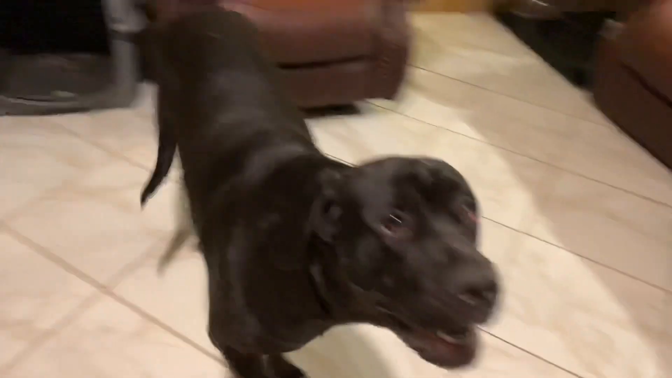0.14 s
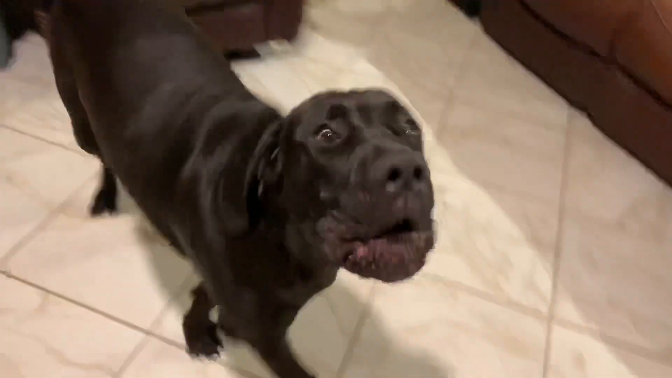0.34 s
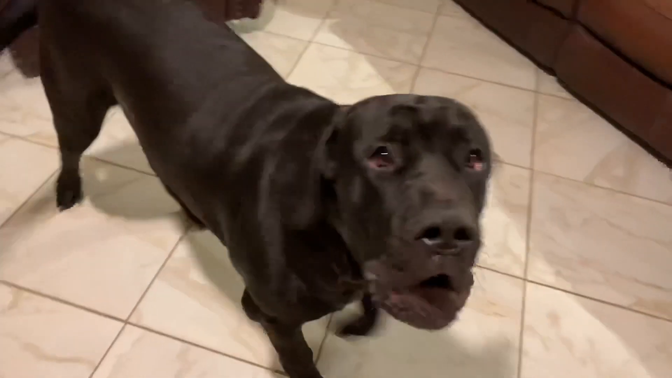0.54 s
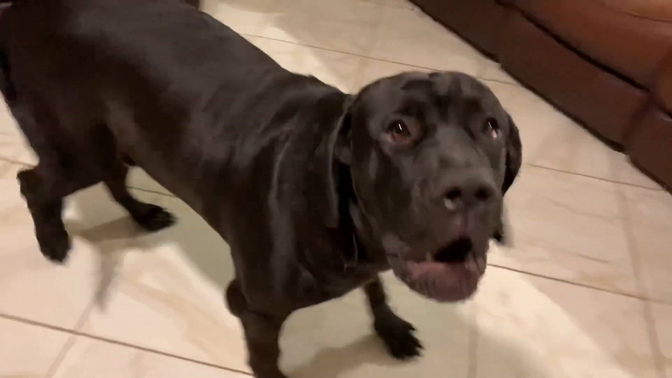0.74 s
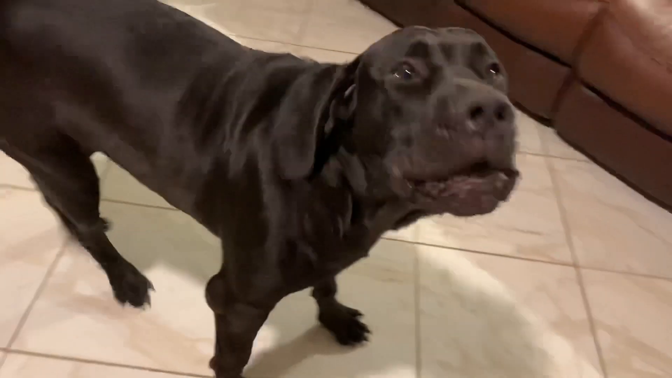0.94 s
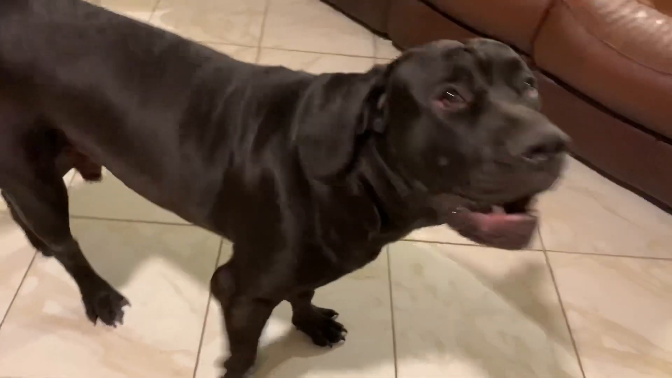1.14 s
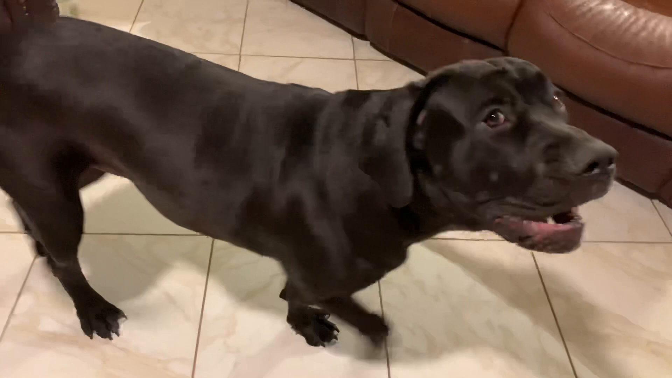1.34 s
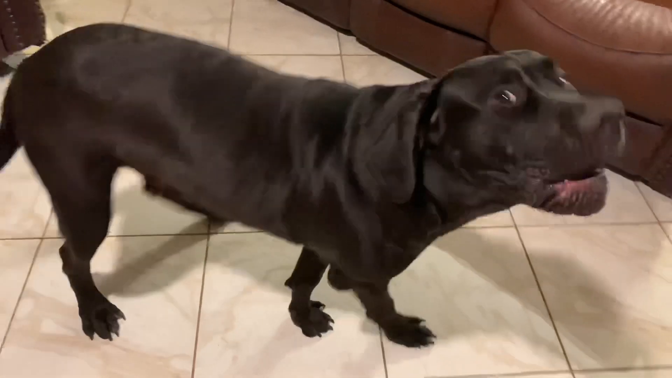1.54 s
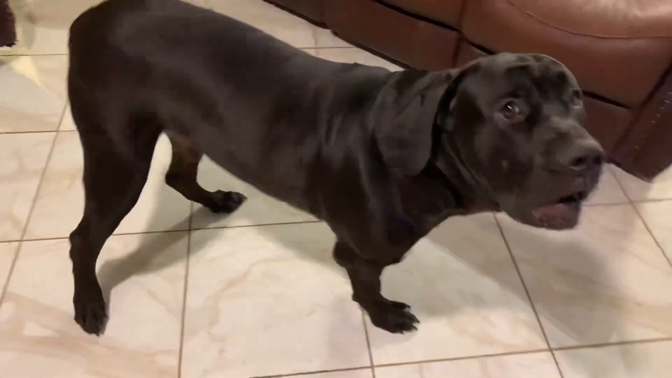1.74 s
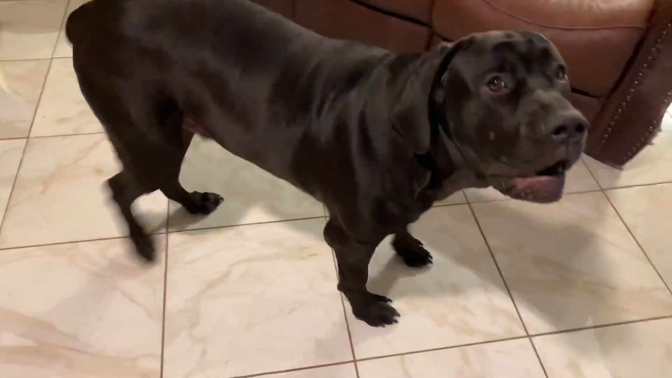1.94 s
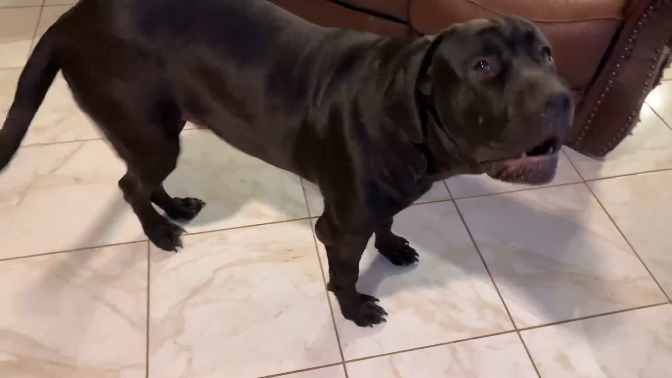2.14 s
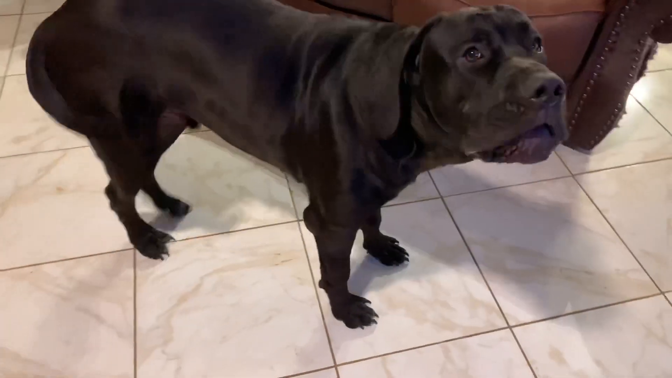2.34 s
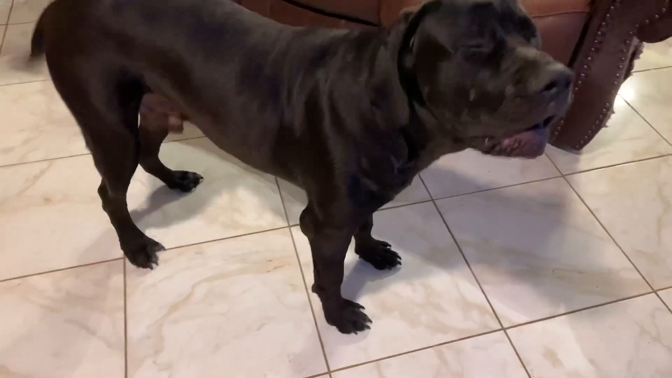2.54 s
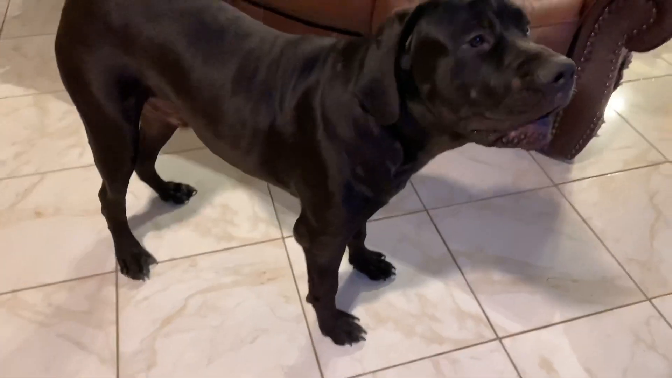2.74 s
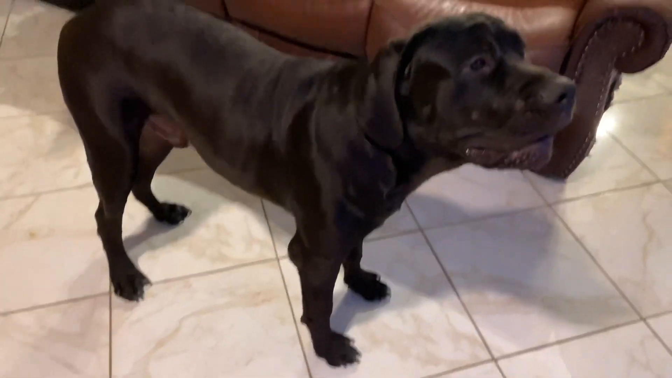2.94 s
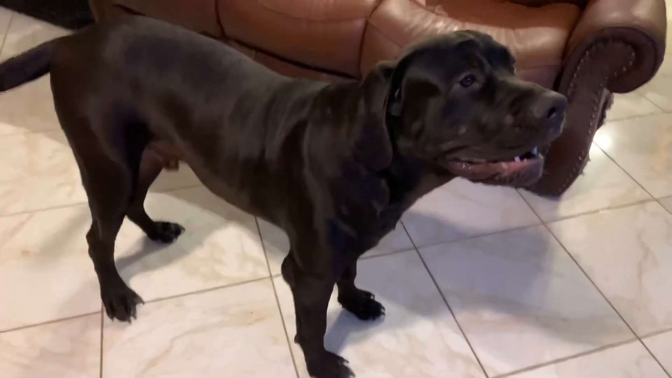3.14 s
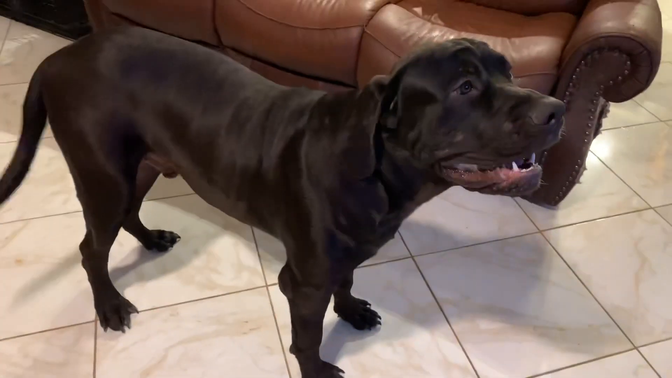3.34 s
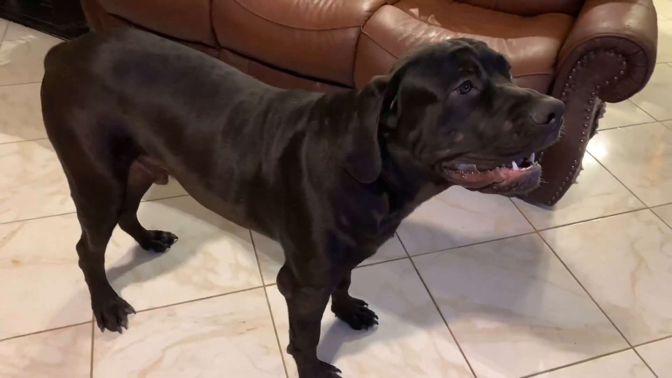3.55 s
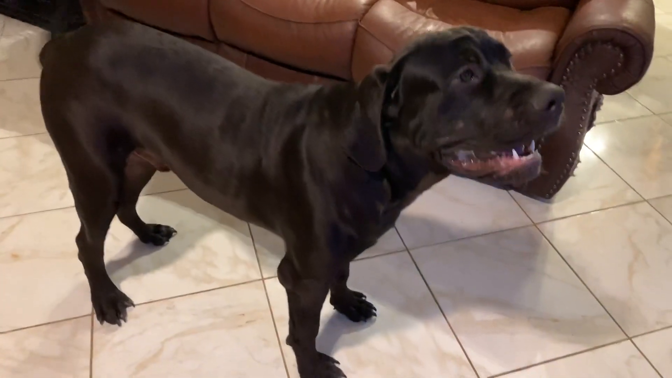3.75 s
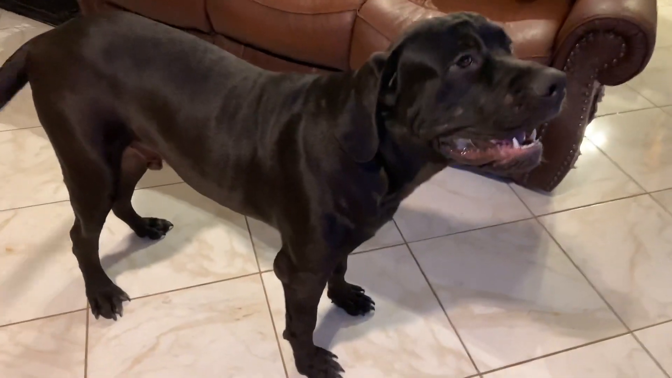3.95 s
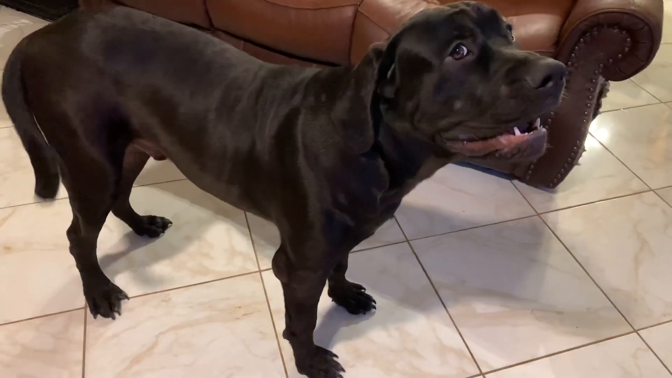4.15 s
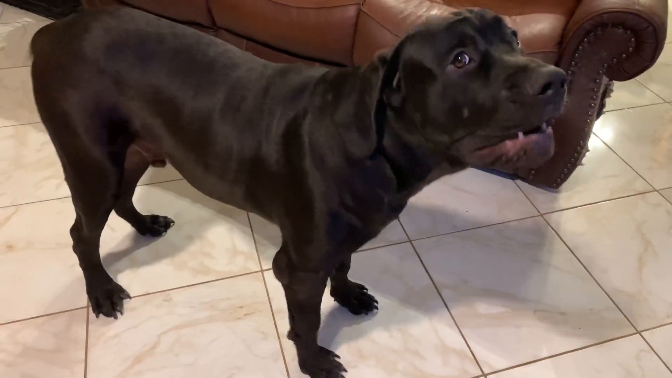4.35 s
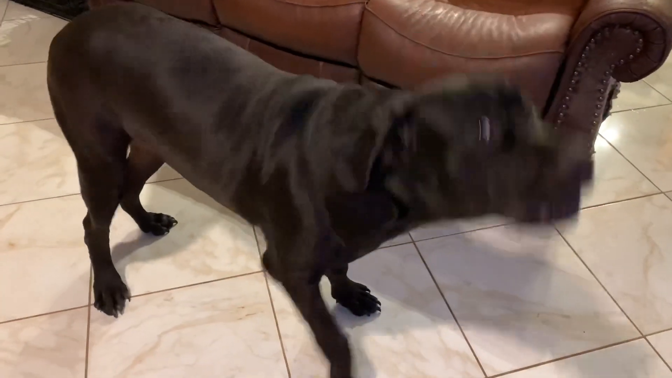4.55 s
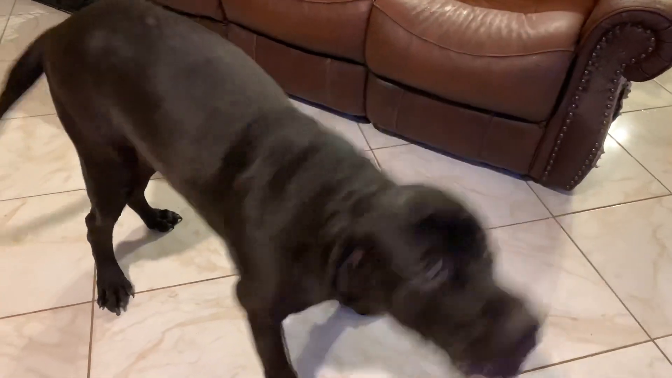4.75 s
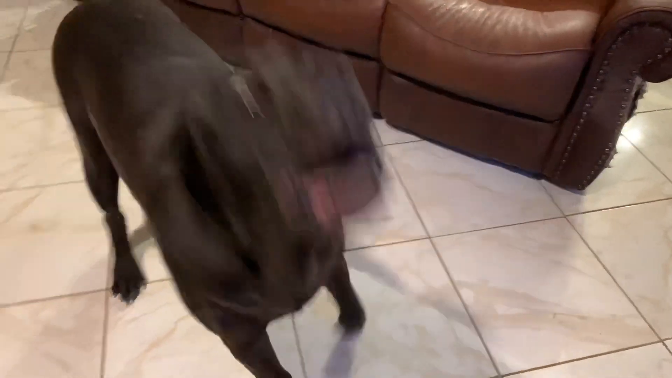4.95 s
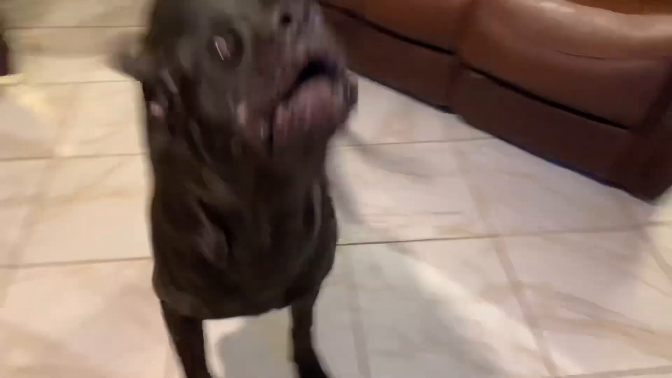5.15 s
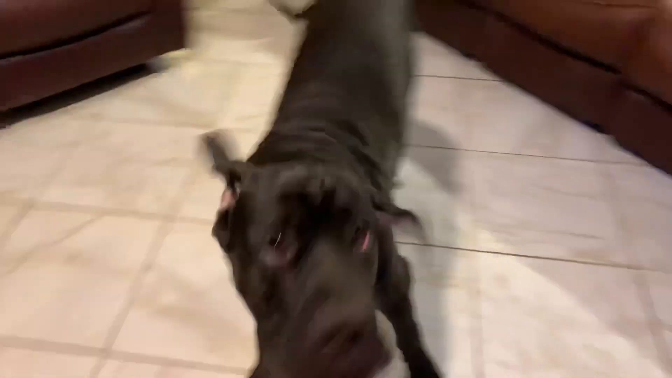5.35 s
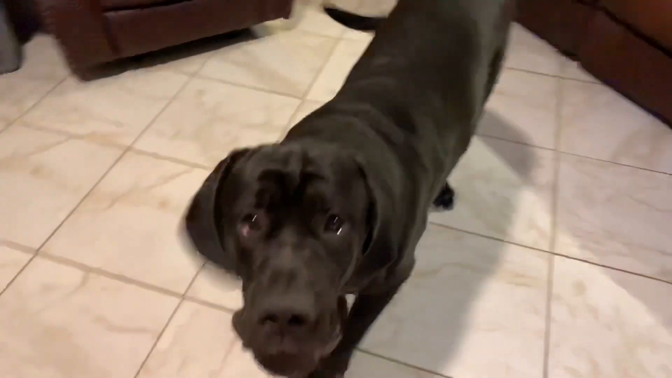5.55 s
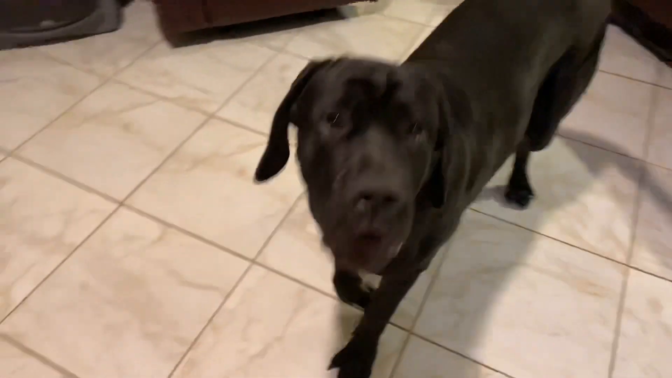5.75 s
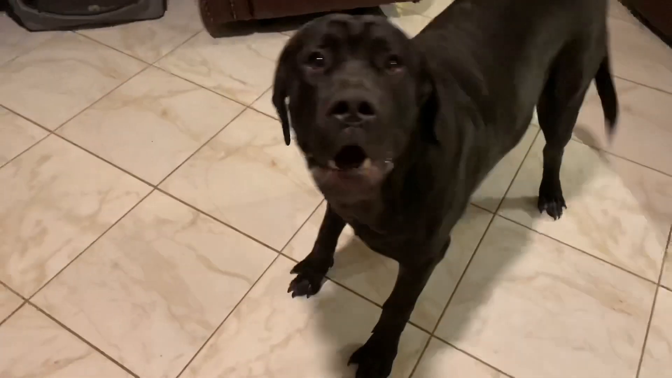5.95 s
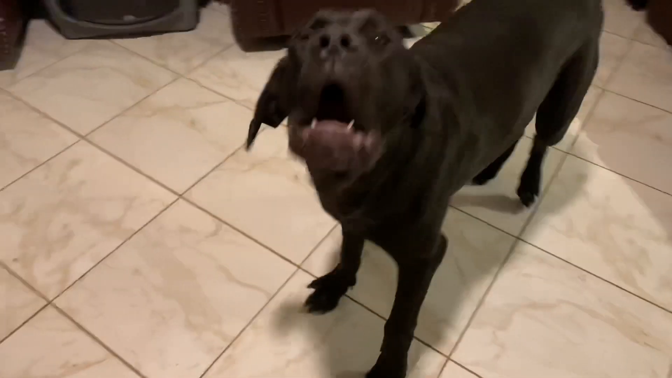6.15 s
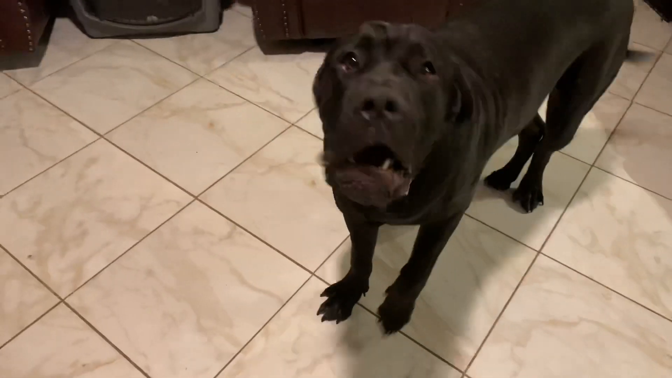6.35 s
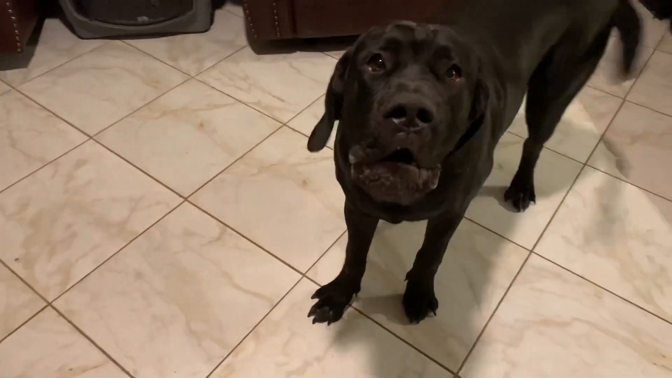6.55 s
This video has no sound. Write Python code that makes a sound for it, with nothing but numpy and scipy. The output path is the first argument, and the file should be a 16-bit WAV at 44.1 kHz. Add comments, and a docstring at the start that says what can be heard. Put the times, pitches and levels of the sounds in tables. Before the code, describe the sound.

A big dog barks close by in a tiled living room. Four single barks come about two thirds of a second apart, then a pause with soft paw thuds, faint hiss and two tiny whimpers. Four faster barks follow in a tight run, joined by a low throaty buzz, then a claw tick or two and one last bark. Each bark rings for nearly a second off hard surfaces. Close stereo pickup, quiet background.

```python
"""The ring of an earlier bark dies over faint shuffling; then a large dog barks nine times in a tiled room.
It stands close to two microphones. Each bark starts hoarse with the jaw wide, arches in pitch and sinks as the
mouth shuts: fold pulses and puffs of air pass a resonant throat, and dense reflections ring after it.
Around the barks, bursts of coloured noise make claw ticks on tile, soft paw thuds and huffs;
gliding tones make two whimpers and a low buzz within the quick run."""
import sys
import numpy as np
from scipy import signal
from scipy.fft import rfft, irfft
from scipy.io import wavfile
from scipy.ndimage import uniform_filter1d

SR = 44100
rng = np.random.default_rng(int(sys.argv[2]) if len(sys.argv) > 2 else 0)


def store_wav(level_fs):
    """Save 16-bit WAV to argv[1]."""
    pcm = np.round(np.clip(np.atleast_2d(level_fs), -1, 1) * 32767)
    wavfile.write(sys.argv[1], SR, pcm.T.astype(np.int16))


N = 291501


def gain_of(db):
    """Decibels to gain."""
    return 10 ** (np.asarray(db) / 20)


def evened(x):
    """Scales to rms 1."""
    return x / np.sqrt(np.mean(x ** 2) + 1e-20)


def steadied(x, size=500):
    """Scales to a running rms of 1."""
    power = uniform_filter1d(uniform_filter1d(x ** 2, size), size)
    return x / np.sqrt(power + 1e-12)


def read(points, hz):
    """Reads a table on a log-frequency axis."""
    f, value = np.transpose(points)
    return np.interp(np.log(hz + 1), np.log(f + 1), value)


def bump(x, middle, width):
    """A bell of height 1."""
    return np.exp(-((x - middle) / width) ** 2)


def wobble(count, size):
    """Smooth random wavering of rms 1; a larger size (samples) wavers more slowly."""
    return evened(uniform_filter1d(uniform_filter1d(rng.standard_normal(count), size), size))


def add(mix, s, sound):
    """Adds a sound to a stereo mix at a time in seconds."""
    part = mix[:, max(round(s * SR), 0):][:, :sound.shape[1]]
    part += sound[:, :part.shape[1]]


def paired(z, same):
    """Makes two unrelated channels alike by the share same."""
    same = np.clip(same, -1, 1)
    return np.array([z[0], same * z[0] + np.sqrt(1 - same ** 2) * z[1]])


# likeness of the two microphones for floor and air noise: [f/Hz, likeness 0-1]
FLOOR_SAME = [(100, .85), (300, .7), (650, 0.1), (1400, 0.11), (15000, .1)]


def noise(colour, count):
    """Stereo noise of a given colour and rms 1, near mono in the bass."""
    hz = np.fft.rfftfreq(count, 1 / SR)
    spectrum = paired(rfft(rng.standard_normal((2, count))), read(FLOOR_SAME, hz))
    return evened(irfft(spectrum * gain_of(read(colour, hz)), count))


# quiet air of the place: [f/Hz, relative level/dB per Hz]
AIR_COLOUR = [(18, -32), (30, -15), (69, 3), (328, -6), (581, -4), (716, -8.5), (2370, -17), (7240, -27.5),
              (8920, -22.5), (11600, -43), (15000, -34)]
AIR_DB = -64
# low shuffling on the floor: [t/s, level/dB]
SHUFFLE = [(0, -60.5), (1.2, -64), (1.75, -59), (2.05, -59), (2.5, -55), (2.9, -59), (3.5, -55.5),
           (3.65, -73.5), (4.0, -67.5), (4.3, -72), (5.9, -66.5), (6.6, -67)]
# its colour: [f/Hz, relative level/dB per Hz]
SHUFFLE_COLOUR = [(20, -21), (58, 4), (110, -5), (200, -4), (400, -24.5), (1200, -34), (4000, -54)]
# swells of soft hiss: [middle t/s, half width/s, level/dB]
HISSES = [(0.682, .2, -62), (2.95, 0.22, -60), (3.481, 0.13, -56.5), (4.172, 0.15, -64), (6.6, 0.29, -63.5)]
# their colour: [f/Hz, relative level/dB per Hz]
HISS_COLOUR = [(200, -3), (1000, 2.5), (3000, -4), (5000, -7), (7200, -13), (9000, -4.5), (11500, -17.5),
               (15000, -10.5)]
# colour of the room still ringing from an earlier bark: [f/Hz, relative level/dB per Hz]
OLD_RING_COLOUR = [(150, -20.5), (420, 1), (600, -6), (830, 0), (1100, -10), (1450, -7.5), (2150, 0.5),
                   (2450, -7.5), (2700, -32), (9000, -43)]
OLD_RING_DB, OLD_RING_T60 = -55.5, 1.1  # level/dB at the start, time to fall 60 dB/s


def background(uneven_db=5.5):
    """Uneven shuffling, swells of hiss, quiet air and the dying ring of an earlier bark, all coloured noise."""
    t = np.arange(N) / SR
    shuffle_db = np.interp(t, *np.transpose(SHUFFLE)) + uneven_db * wobble(N, size=3000)
    shuffle = noise(SHUFFLE_COLOUR, N) * gain_of(shuffle_db)
    swells = sum(gain_of(db) * bump(t, s, width) for s, width, db in HISSES)
    hiss = noise(HISS_COLOUR, N) * swells
    old_ring = noise(OLD_RING_COLOUR, N) * gain_of(OLD_RING_DB - 60 * t / OLD_RING_T60)
    return shuffle + hiss + old_ring + gain_of(AIR_DB) * noise(AIR_COLOUR, N)


# reverberation of the tiled room: [f/Hz, time to fall 60 dB/s]
ROOM_T60 = [(150, 0.27), (400, 0.7), (800, 0.79), (2200, 0.94), (4500, 0.89), (9000, 0.15), (15000, 0.13)]
# strength of the reflections: [f/Hz, level/dB]
ROOM_DB = [(200, -12.5), (420, -8), (800, -5.5), (1400, -6.5), (2200, -7), (5000, -8), (12000, 4)]
# likeness of the reflections at the two microphones: [f/Hz, likeness 0-1]
ROOM_SAME = [(100, 0), (300, 0.5), (650, 0.12), (1400, 0), (15000, 0)]


def room(x, early_db=-4, early_t60=0.36, gap=0.014):
    """Dense reflections: an early wash from floor and furniture, then a tail with its own decay in each band."""
    hz, t, z = signal.stft(rng.choice([-1., 1.], (2, SR)), SR, nperseg=512)
    z = paired(z, read(ROOM_SAME, hz)[:, None])
    # many reflections even each other out, so every band carries a steady share
    z /= np.sqrt(uniform_filter1d(abs(z) ** 2, size=9, axis=2))
    unit = np.std(signal.istft(z, nperseg=512)[1])
    t60 = read(ROOM_T60, hz)[:, None]
    late = gain_of(-60 * t / t60) ** 2 / t60
    early = gain_of(early_db - 60 * t / early_t60) ** 2 / early_t60
    decay = np.sqrt((late + early) * 2 * np.log(1000) / SR)
    z *= decay * gain_of(read(ROOM_DB, hz))[:, None] / unit
    tail = signal.istft(z, nperseg=512)[1]
    # the wash fades in from half to one and a half gaps (s) after the direct sound
    tail *= np.clip(np.arange(tail.shape[1]) / SR / gap - .5, 0, 1)
    return signal.fftconvolve(x.mean(0)[None], tail, axes=1)[:, :N]


def taps(rows, colour, t60, level_db, attack_s):
    """Short dry noise bursts with a linear attack that die at once; level_db shifts every row."""
    out, t = np.zeros((2, N)), np.arange(SR // 8) / SR
    for s, db in rows:
        envelope = np.minimum(t / attack_s, 1) * gain_of(db + level_db - 60 * t / t60)
        add(out, s, noise(colour, len(t)) * envelope)
    return out


# paws landing on the floor: [t/s, relative level/dB]
PAWS = [(0.723, -33.5), (1.098, -42), (1.39, -40), (1.775, -39), (2.528, -37.5), (2.809, -47.5),
        (2.949, -44.5), (3.04, -55), (3.258, -44), (3.369, -51), (3.508, -45.5), (5.678, -36.5)]
# their colour: [f/Hz, relative level/dB per Hz]
PAW_COLOUR = [(25, -12.5), (70, 2), (130, -4.5), (220, -20), (450, -14.5), (2000, -69)]


def paws():
    """Soft landings: mostly bass noise with a slower attack than the claws."""
    return taps(PAWS, PAW_COLOUR, t60=0.13, level_db=-3, attack_s=0.0034)


# claws on tile: [t/s, relative level/dB]
CLAWS = [(2.4517, -41.5), (5.119, -43.5), (5.5108, -50), (5.527, -55), (5.5677, -40.5), (5.586, -53),
         (5.9344, -51.5), (6.4237, -52)]
# their colour: [f/Hz, relative level/dB per Hz]
CLAW_COLOUR = [(500, -26), (3000, -32), (6000, -8.5), (9000, 3.5), (11500, -12.5), (15000, 1)]


def claws():
    """Hard small contacts: very short bursts of bright noise."""
    return taps(CLAWS, CLAW_COLOUR, t60=0.015, level_db=1.5, attack_s=.0003)


# soft huffs as the jaw opens for a bark: [t/s, relative level/dB]
HUFFS = [(.139, -35.5), (1.397, -37.5), (2.1, -42)]
# their colour: [f/Hz, relative level/dB per Hz]
HUFF_COLOUR = [(80, -32.5), (300, -4), (520, 7.5), (950, -5.5), (1700, -12.5), (2600, -28), (3200, -48),
               (9000, -58)]


def huffs():
    """Breath through the opening jaw: short bursts of middle-band noise."""
    return taps(HUFFS, HUFF_COLOUR, t60=0.087, level_db=2, attack_s=.003)


# whimpers: [start t/s, length/s, tone f/Hz, tone level/dB, whistle f/Hz, whistle level/dB]
WHIMPERS = [(3.79, 0.24, 574, -65, 2340, -66), (4.161, 0.3, 995, -69, 4110, -69.5)]


def whimper(start, length, pitch_hz, tone_db, whistle_hz, whistle_db, arch=0.0634, sag=0.074, lead=1.66):
    """A fuzzy, falling nose whistle leads into a soft closed-mouth tone."""
    u = np.arange(0, length, 1 / SR) / length
    tone_glide = pitch_hz * (1 - arch * (2 * u - 1) ** 2)
    whistle_glide = whistle_hz * (1 - sag * (u - .5))
    tone, whistle = (evened(np.sin(2 * np.pi * np.cumsum(hz) / SR)) for hz in (tone_glide, whistle_glide))
    # the whistle swells early, the tone late
    tone *= gain_of(tone_db) * np.sin(np.pi * u ** lead) ** 2
    whistle *= gain_of(whistle_db) * np.sin(np.pi * u ** (1 / lead)) ** 2 * wobble(len(u), size=70)
    return start, (tone + whistle)[None]


# in the quick run the folds keep buzzing low between barks: [start t/s, length/s, lowest f/Hz, level/dB]
HUMS = [(4.55, 0.041, 198, -41), (4.78, 0.094, 179.4, -37), (5.04, .12, 175, -40.5)]


def hum(start, length, low_hz, level_db, dip=0.34, octave_db=-14):
    """A nearly pure low note that dips in pitch between two barks."""
    u = np.linspace(-1, 1, round(length * SR))
    phase = 2 * np.pi * np.cumsum(low_hz * (1 + dip * u ** 2)) / SR
    tone = evened(np.sin(phase) + gain_of(octave_db) * np.sin(2 * phase))
    return start, (tone * gain_of(level_db) * np.cos(np.pi / 2 * u))[None]


# throat resonances, mouth open: [f/Hz, width/Hz, level/dB, exponent by which f follows the mouth]
THROAT = [(464.3, 31, 7, 0.65), (790, 50, 0.6, 0.69), (886, 85, -4, 0.78), (1445, 60, 0.24, 1.2),
          (1870, 90, -11, 0.11), (2203, 34, -3, 0.59)]


def throat(hz, mouth, bright_db, middle_db, top_db, skirt=1.3, low_hz=215, cliff_hz=2480):
    """Gain of the throat: narrow resonances between a dark bass and a steep upper cliff."""
    middle_lift = middle_db + 0.5 * bright_db
    lifts = [0, middle_lift, middle_lift, bright_db, bright_db, bright_db + top_db]
    power = 0
    for (f, width, db, follow), lift in zip(THROAT, lifts):
        power = power + gain_of(db + lift) ** 2 / (1 + ((hz - f * mouth ** follow) / width) ** 2) ** skirt
    cliff = 1 + (hz / (cliff_hz * mouth ** .35)) ** 60
    bass = 1 + (low_hz / (hz + 1)) ** 8
    return np.sqrt(power / cliff / bass)


# pitch: one arch from slack folds to the top and down again; a skew over 1 delays the move
START_HZ, END_HZ, RISE_SKEW, FALL_SKEW = 226.8, 159.15, 0.97, 1.1
# brightness: a bite part of the way up (place and width as shares of the rise), dull at both ends
BITE_DB, BITE_AT, BITE_WIDTH, DULL_START_DB, DULL_END_DB = 7, 0.5, .25, -14.5, -7
# the jaw shuts by this share while the pitch falls; a curve under 1 shuts it early
JAW_SHUT, JAW_CURVE = 0.34, 0.66
# roughness (share): of the clear voice, added at the onset, and added as the folds slacken at the end
ROUGH_CLEAR, ROUGH_ONSET, ROUGH_END = .05, 0.58, 0.17
# the voice breaks up hoarsely just after the top (s) and weakens (dB at full hoarseness)
BREAK_AFTER_S, BREAK_WIDTH_S, BREAK_DB = 0.021, 0.025, -2.5
# effort: onset, swell over the rise, release over the fall
ONSET_DB, SWELL_DB, RELEASE_DB = -19.5, 2, -31
# chance wavering of pitch (rms share) and effort (rms dB)
WAVER, WAVER_DB = 0.0071, 0.63


def gesture(t, attack_s, rise_s, fall_s, hold, top_hz, effort_db, bright_db, jaw, hoarse):
    """Pitch, effort, brightness, mouth opening and roughness through one bark."""
    up, down = np.clip(t / rise_s, 0, 1), np.clip((t - rise_s) / fall_s, 0, 1)
    rise_hz = (top_hz - START_HZ) * np.sin(np.pi / 2 * up ** RISE_SKEW) ** 2
    fall_hz = (END_HZ - top_hz) * np.sin(np.pi / 2 * down ** FALL_SKEW) ** 2
    hz = (START_HZ + rise_hz + fall_hz) * (1 + WAVER * wobble(len(t), size=600))
    bite = BITE_DB * bump(t / rise_s, BITE_AT, BITE_WIDTH)
    bright = bright_db + bite + DULL_START_DB * (1 - up) ** 2 + DULL_END_DB * down
    mouth = jaw * (1 - JAW_SHUT * down ** JAW_CURVE)
    broken = hoarse * bump(t, rise_s + BREAK_AFTER_S, BREAK_WIDTH_S)
    rough = ROUGH_CLEAR + ROUGH_ONSET * (1 - up) + broken + ROUGH_END * down
    effort = effort_db + ONSET_DB * np.maximum(1 - t / attack_s, 0) - SWELL_DB * (1 - up)
    effort += RELEASE_DB * down ** hold + BREAK_DB * broken + WAVER_DB * wobble(len(t), size=500)
    return hz, effort, bright, np.clip(mouth, .7, 1.08), np.clip(rough, .02, .65)


def fold_pulses(phase, controls, middle_db, top_db, half_db, shimmer=0.056, throb_db=8.0, slope_db=-2.0):
    """Vocal-fold pulses as harmonics, each weighted by the throat at its own frequency."""
    hz, _, bright_db, mouth, rough = controls
    count = len(phase)
    # slack folds close softly, so the low ends of a bark are mostly fundamental (dB an octave)
    tilt_db = slope_db + np.interp(mouth, [.72, .85], [-6, 0])
    folds = np.zeros(count)
    # alternately strong and weak pulses put lines halfway between the harmonics
    for k in np.arange(2, 25) / 2:
        source = gain_of(half_db * (k % 1 > 0) + tilt_db * np.log2(k)) * np.cos(k * phase - k * k)
        folds += source * throat(k * hz, mouth, bright_db, middle_db, top_db)
    folds = steadied(folds) * (1 + shimmer * rough * wobble(count, size=90))
    # hoarse stretches throb irregularly
    return folds * gain_of(throb_db * rough * wobble(count, size=300))


# rasp of air over tongue and teeth: [f/Hz, relative level/dB per Hz]
RASP = [(1500, -49), (2650, -44.5), (3000, -35), (4200, -35.5), (4900, -31.5), (6200, -34.5), (7200, -47),
        (8800, -34), (11000, -52.5), (15000, -47)]


def breath(t, phase, controls, middle_db, top_db, rasp_db, puff_depth=1.0, rasp_same=0.85,
           patchy_db=5, grain_db=3):
    """Air escapes in one puff a cycle; part passes the throat, part rasps over tongue and teeth."""
    _, _, bright_db, mouth, _ = controls
    count = len(t)
    puffs = rng.standard_normal((3, count)) * (1 + puff_depth * np.cos(phase))
    f, at, z = signal.stft(puffs, SR, nperseg=512, noverlap=384)
    opening, bright = (np.interp(at, t, c) for c in (mouth, bright_db))
    shape = throat(f[:, None], opening, bright, middle_db, top_db)
    scale = np.sqrt(np.mean(shape ** 2, axis=0))
    z[0] *= shape / scale
    # random narrow patches of the rasp swell and fade by chance
    patches = uniform_filter1d(rng.standard_normal(shape.shape), size=3, axis=0)
    patches = evened(uniform_filter1d(patches, size=16, axis=1))
    colour_db = read(RASP, f)[:, None] + patchy_db * patches
    z[1:] *= gain_of(colour_db + rasp_db + 0.94 * bright - 8.0) / scale
    air = signal.istft(z, nperseg=512, noverlap=384)[1][:, :count]
    rasp = paired(air[1:], rasp_same) * gain_of(grain_db * wobble(count, size=130))
    # the rasp is strongest in the first rush of air and fades as the bark ends
    rasp *= gain_of(np.interp(t, [0, .02, .05, .13], [-4, 4.0, 2.5, -5.5]))
    return steadied(air[0]), rasp


# low push of air at the height of each bark: dB under the voice, time and half width (s)
PUSH_DB, PUSH_AT_S, PUSH_WIDTH_S = -38, 0.1, 0.016


def bark(t, controls, middle_db, top_db, rasp_db, half_db, jitter=0.018):
    """Jittery vocal-fold pulses and puffs of air pass a throat that opens and shuts."""
    hz, effort_db, _, _, rough = controls
    count = len(t)
    phase = 2 * np.pi * np.cumsum(hz * (1 + jitter * 2 * rough * wobble(count, size=60))) / SR
    folds = fold_pulses(phase, controls, middle_db, top_db, half_db)
    throat_air, rasp = breath(t, phase, controls, middle_db, top_db, rasp_db)
    voice = np.sqrt(1 - rough ** 2) * folds + rough * throat_air
    push = gain_of(PUSH_DB) * bump(t, PUSH_AT_S, PUSH_WIDTH_S) * noise(SHUFFLE_COLOUR, count)
    return (voice + rasp + push) * gain_of(effort_db) * signal.windows.tukey(count, .04)


def near_echo(sound, lag_ms, share, dull_hz=3000):
    """A hard surface near the muzzle returns a duller copy, which combs the voice."""
    count = sound.shape[1] + SR // 100
    hz = np.fft.rfftfreq(count, 1 / SR)
    echo = share / (1 + (hz / dull_hz) ** 2) * np.exp(-2j * np.pi * hz * lag_ms / 10 ** 3)
    return irfft(rfft(sound, count) * (1 + echo) / np.sqrt(1 + share ** 2), count)


# left minus right level of the dog at the microphones: [f/Hz, level/dB]
BALANCE = [(300, -2), (2000, -2), (3500, -3), (4900, -7), (6500, -1.5), (8000, 0)]


def microphones(sound, lag_ms):
    """The side on which the head is held decides which microphone hears it first."""
    count = sound.shape[1]
    hz = np.fft.rfftfreq(count, 1 / SR)
    # each side takes half the level difference and half the lag
    left = gain_of(read(BALANCE, hz) / 2) * np.exp(-1j * np.pi * hz * lag_ms / 10 ** 3)
    return irfft(rfft(sound) * np.array([left, 1 / left]), count)


# barks: [start t/s, attack/s, pitch rise/s, pitch fall/s, hold (over 1 the effort lets go later), top f/Hz,
#         effort level/dB, brightness/dB, jaw opening (factor on the throat), hoarseness 0-1,
#         middle resonances/dB, top resonance/dB, rasp/dB, strong-weak alternation of the pulses/dB,
#         lag of the nearest echo/ms, lag at the left microphone/ms]
BARKS = [(0.189, 0.02, .076, 0.15, 0.99, 420.3, -11, 4, 1.014, 0.27, 2, -0.5, -1, -19, 2.14, -0.0094),
         (0.771, 0.02, 0.079, .150, 0.86, 414.4, -11, 2, 0.98, 0.22, 4, -2.5, -1.5, -25.5, 2.06, 0.00017),
         (1.417, 0.042, 0.085, 0.16, 1.14, 418.3, -11.5, -1.5, 0.99, 0.73, 3.5, -0.5, 0.5, -16, 1.92, 0.1),
         (2.111, 0.047, 0.086, 0.17, 1.25, 395.6, -13, 4.5, 1, 0.53, 0.5, -0.5, -1, -15, 2.2, 0.1),
         (4.372, .013, .069, .160, 0.98, 420.9, -11.5, -1.5, 1.014, 0.41, 1.5, -1.5, -3.5, -12.5, 1.84, .11),
         (4.588, 0.047, 0.073, .180, 1.7, 428.3, -12, -3, 0.905, 1, 2.5, 2, 1.5, -11, 2, .12),
         (4.836, 0.068, .080, .172, .95, 446.9, -6.5, -7.5, 0.837, 0.029, -3, 5.5, -2.5, -6, 1.6, -.015),
         (5.120, 0.061, 0.089, 0.18, 0.71, 403.2, -9.5, -9, 0.85, 0.57, 2.5, 7, 4, -22, 1.88, -.1),
         (6.061, 0.045, 0.081, 0.14, 1.03, 422.8, -9.5, -8.5, 0.97, 0.72, 2.5, 5, 6.5, -9.5, 2.15, -0.095)]


def barks():
    """All barks: as they reach the microphones directly, and as they are sent into the room."""
    direct, to_room = np.zeros((2, 2, N))
    for start, attack_s, rise_s, fall_s, *voice, middle_db, top_db, rasp_db, half_db, echo_ms, side_ms in BARKS:
        t = np.arange(0, rise_s + fall_s, 1 / SR)
        controls = gesture(t, attack_s, rise_s, fall_s, *voice)
        sound = bark(t, controls, middle_db, top_db, rasp_db, half_db)
        add(direct, start, microphones(near_echo(sound, echo_ms, share=0.23), side_ms))
        add(to_room, start, sound)
    return direct, to_room


def scene():
    """Dog, claws, paws and background; barks, claws and huffs also excite the room."""
    quiet = background() + paws()
    small = claws() + huffs()
    dog, to_room = barks()
    for row in HUMS:
        add(dog, *hum(*row))
    for row in WHIMPERS:
        add(dog, *whimper(*row))
    return dog + small + room(to_room + small) + quiet


EDGE_HZ = 15900  # upper band limit


def record(dry):
    """Peaks are rounded off softly; then the band limit."""
    held = dry / (1 + (dry / .95) ** 8) ** (1 / 8)
    low_pass = signal.firwin(511, EDGE_HZ, window=("kaiser", 9), fs=SR)
    return signal.oaconvolve(held, low_pass[None], "same")


dry = scene()
out = record(dry)
store_wav(out)
```